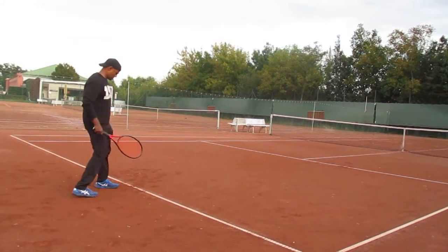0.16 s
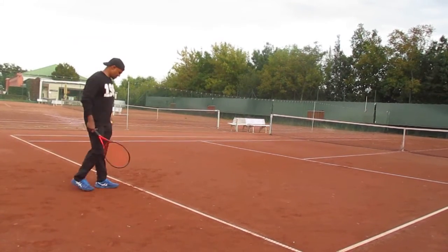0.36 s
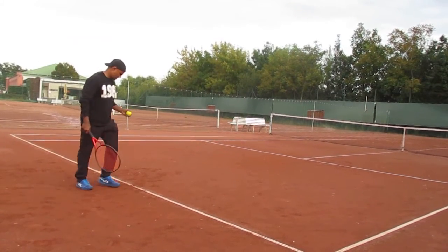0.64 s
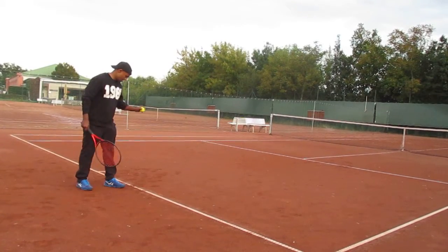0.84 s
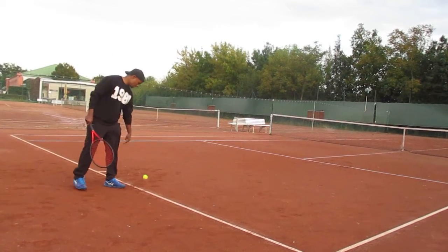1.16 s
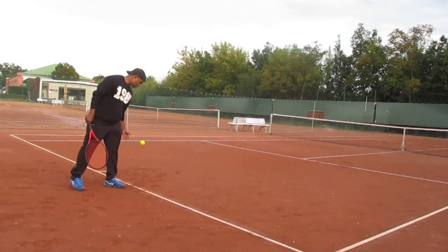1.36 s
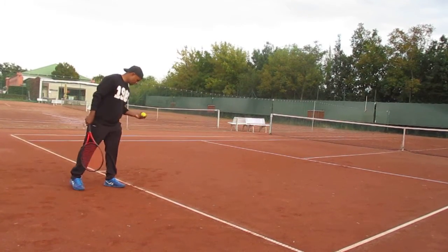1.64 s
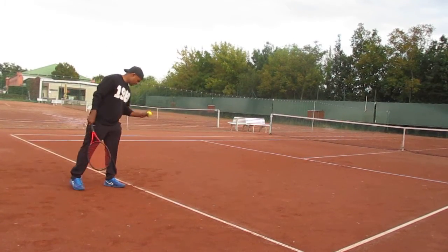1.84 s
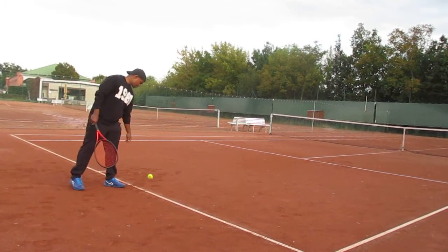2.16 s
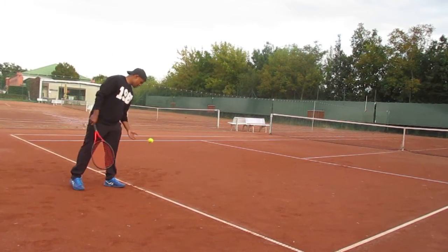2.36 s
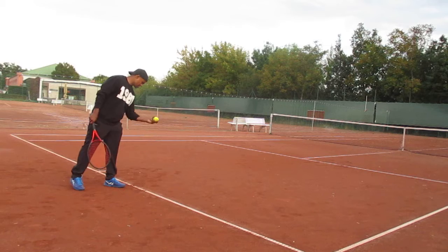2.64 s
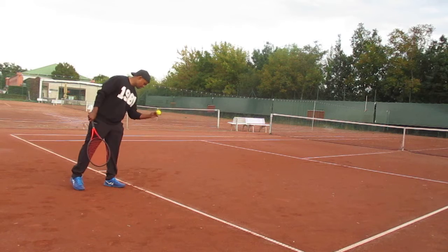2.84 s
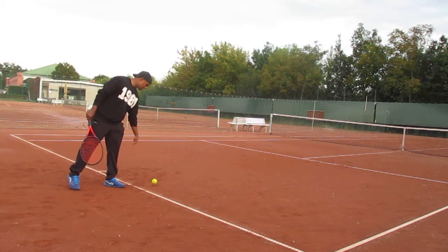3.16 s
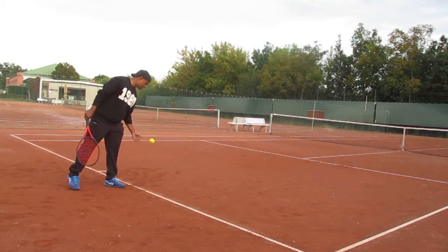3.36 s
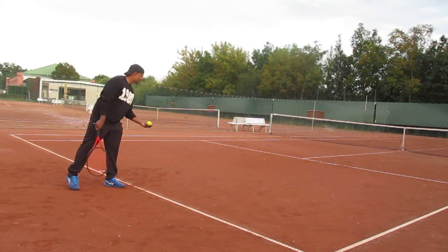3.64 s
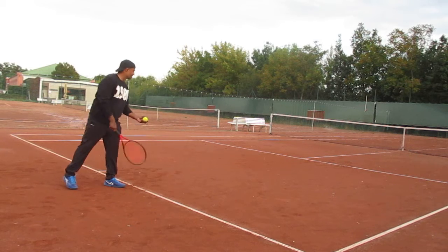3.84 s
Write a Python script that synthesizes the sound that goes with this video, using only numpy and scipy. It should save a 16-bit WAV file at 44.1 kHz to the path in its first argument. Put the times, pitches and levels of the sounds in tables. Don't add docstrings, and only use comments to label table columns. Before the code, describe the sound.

A tennis ball is bounced by hand three times on an outdoor clay court, short hollow thuds about a second apart. Loud wind buffets the small camera microphone at first, then fades; faint shoe scuffs and cheeps.

```python
import sys
import numpy as np
from scipy import signal
from scipy.io import wavfile
from scipy.ndimage import uniform_filter1d

SR = 44100
rng = np.random.default_rng(int(sys.argv[2]) if len(sys.argv) > 2 else 0)


def materialize(psi):
    bounded = np.clip(np.atleast_2d(psi).T, -1, 1)
    quanta = np.round(bounded * 32767).astype(np.int16)
    wavfile.write(sys.argv[1], SR, quanta)


def voltage_ratio(decibels):
    exponent = np.asarray(decibels, float) / 20
    return 10 ** exponent


N = 176400


def rms_one(x):
    return x / np.sqrt(np.mean(x ** 2) + 1e-20)


def in_time(rows):
    seconds, value = np.transpose(rows)
    return np.interp(np.arange(N) / SR, seconds, value)


def bandpass(x, low, high):
    return signal.sosfilt(signal.butter(2, [low, high], "band", fs=SR, output="sos"), x)


def drift(rate_hz):
    r = np.exp(-2 * np.pi * rate_hz * 40 / SR)
    slow = signal.lfilter([1], [1, -2 * r, r * r], rng.standard_normal(N // 40 + 2002))[2000:]
    return np.interp(np.arange(N) / 40, np.arange(len(slow)), rms_one(slow))


def add_eddy(out, start_s, gain, hz, cycles, phase):
    cycles = np.clip(cycles, .06, 1)
    half = int(3 * SR / hz)
    t = np.arange(-half, half) / SR * hz
    bell = np.cos(np.pi * t / 6) ** 2 / (1 + (t / cycles) ** 2)
    i = int(start_s * SR) + SR - half
    out[i:i + 2 * half] += gain * np.cos(2 * np.pi * t + phase) * bell


SLAP_LAG_S = 0.00401

# time in seconds, level in dB.
GUST_LEVEL = [(0.0, -30.5), (0.04, -17.5), (0.17, -31.5), (0.21, -17), (0.24, -27), (0.63, -27),
              (0.77, -42), (0.91, -28), (0.95, -17.5), (1.19, -39), (1.2, -31), (1.4, -30.5), (1.5, -45.5),
              (1.67, -37), (1.77, -42), (1.79, -45), (2.06, -50.5), (4.0, -41)]


def eddy_swarm():
    out, level = np.zeros(N + 2 * SR), in_time(GUST_LEVEL)
    eddies_per_s, size_spread_db, pitch_spread, top_ratio = 330, 2.5, 0.48, 1.28
    base_hz, follows, calm_db = 221.4, 0.39, -40
    gap, size, pitch, phase = rng.random((4000, 4)).T
    starts = np.cumsum(-np.log(1 - gap) / eddies_per_s)
    sizes = voltage_ratio(size_spread_db * np.minimum(-np.log(1 - size), 4))
    pitches = top_ratio * np.exp(pitch_spread * np.log(pitch))
    for s, size, pitch, turn in zip(starts[starts < N / SR], sizes, pitches, phase):
        wind_db = max(level[int(s * SR)], calm_db)
        hz = np.clip(base_hz * pitch * voltage_ratio(follows * (wind_db + 25)), 20, 900)
        add_eddy(out, s, size, hz, cycles=0.32, phase=2 * np.pi * turn)

    swarm = out[SR:SR + N]
    swarm = swarm / np.sqrt(uniform_filter1d(swarm ** 2, size=5000) + 1e-9)
    swarm = swarm * voltage_ratio(np.minimum(level + 2.7, -21))

    lull_db, lump_s = -3, .016
    t = np.arange(0, N, 50) / SR
    lumps = [np.exp(-.5 * ((t - row[0] - SLAP_LAG_S) / lump_s) ** 2) for row in WIND_SLAPS]
    lull = np.interp(np.arange(N) / SR, t, 1 - np.max(lumps, axis=0))
    return swarm * voltage_ratio(lull_db * lull)


# time in seconds, peak in dB, pitch in Hz,
# level of its fine eddies in dB.
WIND_SLAPS = [(0.011, -18.5, 229, -41), (0.036, -5, 223, -33.5), (0.059, -6.5, 377, -25.5),
              (0.109, -11, 270, -54), (0.155, -32, 254, -46), (0.211, 1, 302, -21), (0.235, -15, 195, -57),
              (0.304, -13, 183, -50), (0.371, -13.5, 209, -41), (0.452, -40, 121, -44),
              (0.515, -10, 144.7, -50), (0.539, -23, 180, -28), (0.569, -16, 121, -45.5),
              (0.63, -14, 153, -47.5), (0.912, -10.5, 194, -52), (0.946, -6.5, 167, -32),
              (0.993, -20.5, 212.5, -43), (1.039, -18, 242, -46), (1.075, -29, 121, -45),
              (1.121, -25, 121, -56), (1.22, -20, 129, -54), (1.274, -18, 174, -51), (1.389, -19, 143, -64),
              (1.653, -23.5, 121, -66), (1.796, -20, 121, -67), (1.839, -24, 150, -54),
              (1.865, -29, 135, -66), (1.947, -34, 116, -69)]


def wind_slaps():
    out = np.zeros(N + 2 * SR)
    fine_center_hz, fine_scatter_s = 540, .003
    draws = rng.normal(0, 1, (len(WIND_SLAPS), 16))
    for (s, db, hz, fine_db), draw in zip(WIND_SLAPS, draws):
        center_s = s + SLAP_LAG_S
        add_eddy(out, center_s, voltage_ratio(db - 1.5), hz, cycles=0.41, phase=0.96 * draw[0])
        for late, pitch, phase in draw[1:].reshape(-1, 3):
            fine_s = center_s + fine_scatter_s * late
            fine_hz = fine_center_hz * np.exp(.25 * pitch)
            add_eddy(out, fine_s, voltage_ratio(fine_db + 4), fine_hz, cycles=.52, phase=2 * phase)
    return out[SR:SR + N]


def wind():
    low_cut = signal.butter(1, 45, "high", fs=SR, output="sos")
    return signal.sosfilt(low_cut, eddy_swarm() + wind_slaps())


def banded_noise(spectrum, patchy_db):
    out, together = 0, drift(7.4)
    hz, db = np.transpose(spectrum)
    edges = hz[0] * 2 ** np.arange(0, np.log2(hz[-1] / hz[0]) + .2, 1 / 3)
    white = rng.standard_normal((2, N))
    for k, (low, high) in enumerate(zip(edges, edges[1:])):
        band_db = np.interp(np.log(low * high) / 2, np.log(hz), db)
        flicker_db = patchy_db * (1.5 * together + drift(4.7))
        out = out + bandpass(white[k % 2], low, high) * voltage_ratio(band_db + flicker_db)
    return rms_one(out)


# frequency in Hz, density in dB per Hz.
TRAFFIC = [(18, -35.5), (30, -23.5), (109, -6), (164, -3.5), (190, -17.5), (293, 3.5), (333, -10.5),
           (1000, -7.5), (2600, -29.5), (3380, -65.5), (5720, -120)]


def traffic():
    return voltage_ratio(15.5) * banded_noise(TRAFFIC, patchy_db=0.72)


# frequency in Hz, density in dB per Hz.
LEAVES = [(1180, -41), (2000, -2.5), (3400, -2), (5010, -2), (8970, -5.5), (12200, -11.5), (15500, -18.5)]


def leaves():
    return voltage_ratio(-1) * banded_noise(LEAVES, patchy_db=.2)


# frequency in Hz, level in dB, flicker in dB.
WHINES = [(4801, -29, 3.0), (6402, -29, 3.0), (11795, -24, 1.5)]


def whines():
    out, t = np.zeros(N), np.arange(N) / SR
    for hz, db, flicker_db in WHINES:
        level = voltage_ratio(db + flicker_db * drift(6))
        out += level * np.sin(2 * np.pi * hz * t + .8 * drift(8))
    return out


# time in seconds, gain in dB.
RECOVERING_GAIN = [(0.0, -73.5), (0.36, -75), (0.95, -73.5), (1.39, -71.5), (2.87, -66), (3.22, -64),
                   (4.0, -60.5)]


def far_background():
    return voltage_ratio(in_time(RECOVERING_GAIN)) * (traffic() + leaves() + whines())


# start in seconds, length in seconds, level in dB,
# brightness in Hz, half width in octaves.
SCUFFS = [(.1, 0.033, -78, 12500, .25), (0.15, .025, -67.5, 4000, 0.79), (0.173, 0.12, -67, 3940, 0.9),
          (0.458, 0.025, -63.5, 5940, 0.47), (0.476, 0.1, -65.5, 4300, .9),
          (0.538, 0.0047, -56.5, 3130, 0.54), (0.59, 0.11, -70.5, 4440, .9), (0.862, .025, -70, 3180, 0.82),
          (1.117, 0.16, -72.5, 3000, .7), (1.2895, 0.0027, -52.5, 6300, 0.23),
          (1.2904, 0.0037, -61, 9500, .6), (1.291, 0.024, -67.5, 6000, .4), (3.152, .02, -57.5, 7000, .4),
          (3.165, .04, -72, 7000, .6), (3.861, .02, -60.5, 6300, .45), (3.88, .07, -67, 5440, 0.57)]


def shoes():
    out = np.zeros(N)
    grains_per_s, size_spread_db, rise = 14000, 2.5, .12
    sizes = voltage_ratio(size_spread_db * np.minimum(rng.exponential(1, N), 3))
    signs = rng.choice([-1, 1], N)
    grit = (rng.random(N) < grains_per_s / SR) * sizes * signs
    for s, length_s, db, hz, octaves in SCUFFS:
        i, n = int(s * SR), int(length_s * SR)
        u = np.arange(n) / n
        high = min(hz * 2 ** octaves, .45 * SR)
        band = rms_one(bandpass(grit[i:i + n], hz * 2 ** -octaves, high))
        out[i:i + n] += voltage_ratio(db) * band * np.minimum(u / rise, 1) * np.cos(np.pi / 2 * u)
    return out


# start in seconds, length in seconds, level in dB, pitch in Hz.
CHEEPS = [(0.864, 0.018, -69, 2400), (1.16, .04, -66, 2030), (1.18, .03, -71, 2330),
          (3.012, .035, -67, 3200), (3.093, 0.039, -66, 3200), (3.29, .08, -68, 3200),
          (3.42, 0.027, -67, 3200), (3.537, 0.06, -69, 3200), (3.647, 0.043, -69, 3200),
          (3.783, 0.057, -68, 3200), (3.895, 0.035, -64, 3200), (3.95, .03, -74, 3200)]


def bird():
    out, wobble_rad = np.zeros(N), .7 * drift(40)
    for s, length_s, db, hz in CHEEPS:
        i = np.arange(int(s * SR), min(int((s + length_s) * SR), N))
        whistle = np.sin(2 * np.pi * hz * i / SR + wobble_rad[i])
        out[i] += voltage_ratio(db) * np.hanning(len(i)) ** .5 * whistle
    return out


def modes(table, t):
    t = np.maximum(t, 0)
    out = 0
    for hz, db, t60_s in table:
        out = out + voltage_ratio(db + rng.normal(0, 1) - 60 * t / t60_s) * np.sin(2 * np.pi * hz * t)
    return out


# time in seconds, peak in dB.
BOUNCES = [
    (1.258, -29),
    (2.2072, -28),
    (3.2287, -21),
]
# frequency in Hz, level in dB, 60 dB decay in seconds.
BALL_RING = [(1212, 2, 0.014), (1940, -7, 0.0049), (3000, -19, 0.011), (4600, -31, .005), (6300, -19, .007)]
# frequency in Hz, level in dB, 60 dB decay in seconds.
THUD = [(270, -4, .035), (150, -11, .07), (680, -22, .02)]
# delay in seconds, level in dB.
ECHOES = [(.0052, -18.5), (0.0204, -22)]


def ball():
    out, t = np.zeros(N), np.arange(int(.08 * SR)) / SR
    ball_lag_s, thud_lag_s, rise_s = .0001, 0.00094, .0003
    contact_s, lift_s, lift_loss_db = 0.0028, 0.001, -21
    lift = voltage_ratio(lift_loss_db * np.clip((t - contact_s) / lift_s, 0, 1))
    ring_shape = lift * np.minimum(t / rise_s, 1)
    for s, db in BOUNCES:
        i = int((s + ball_lag_s) * SR)
        thud = modes(THUD, t - thud_lag_s)
        out[i:i + len(t)] += voltage_ratio(db) * (thud - ring_shape * modes(BALL_RING, t))
    out = signal.lfilter(*signal.butter(2, 5000, fs=SR), out)
    dull = signal.lfilter(*signal.butter(1, 2500, fs=SR), out)
    return out + sum(voltage_ratio(db) * np.roll(dull, int(s * SR)) for s, db in ECHOES)


def scene():
    return (wind() + far_background() + shoes() + bird() + ball())[None]


def roll_off(x):
    return signal.sosfilt(signal.butter(12, 15690, fs=SR, output="sos"), x)


def record(dry):
    ceiling = .95
    mix = dry / (1 + (dry / ceiling) ** 6) ** (1 / 6)
    return roll_off(mix)


dry = scene()
out = record(dry)
materialize(out)
```